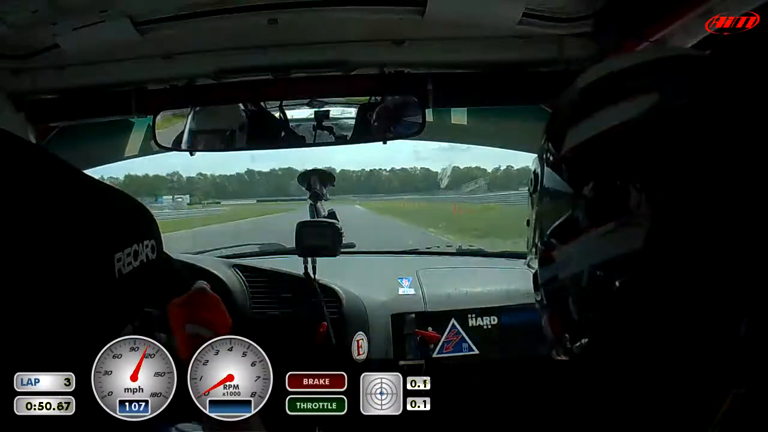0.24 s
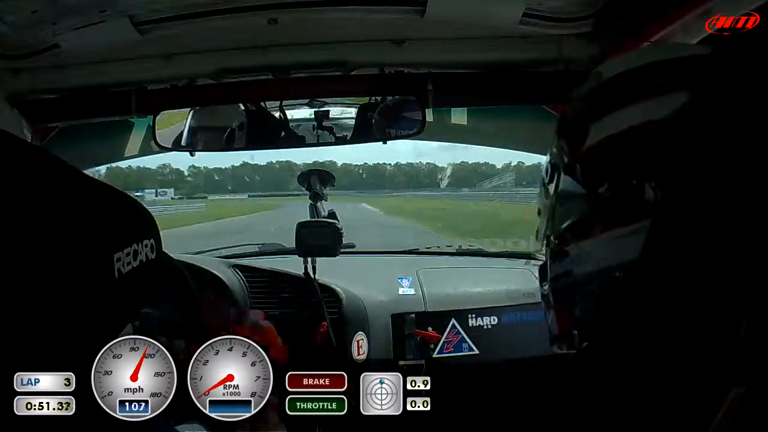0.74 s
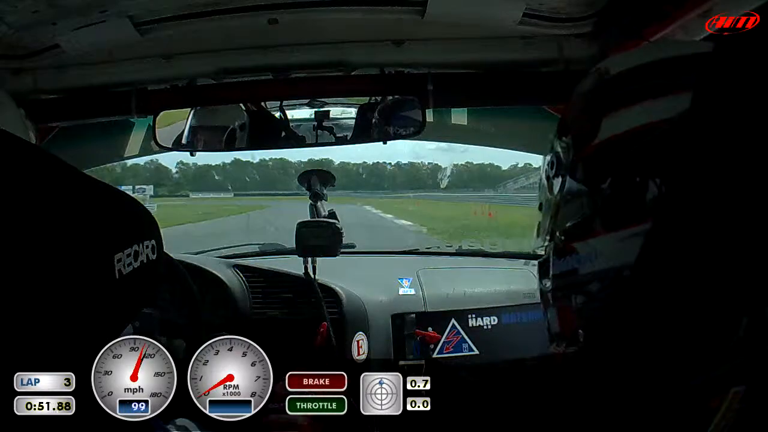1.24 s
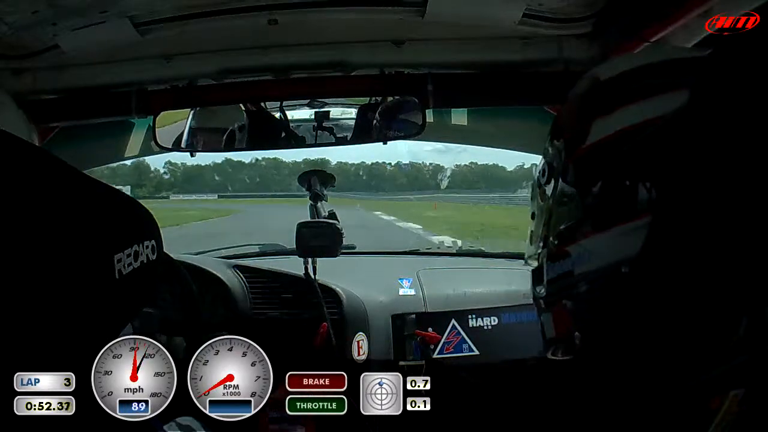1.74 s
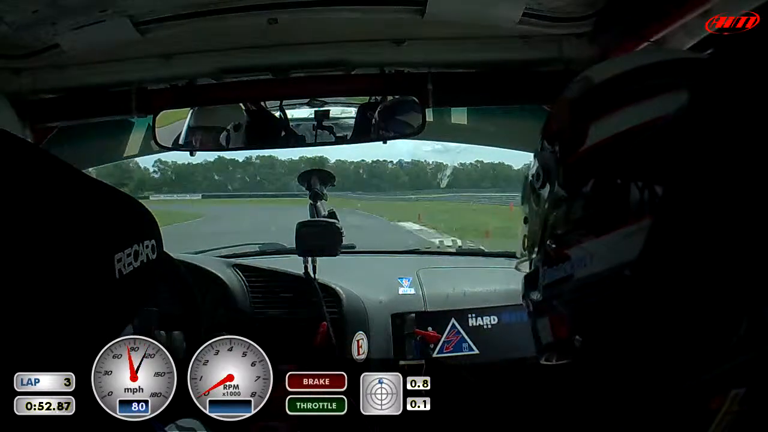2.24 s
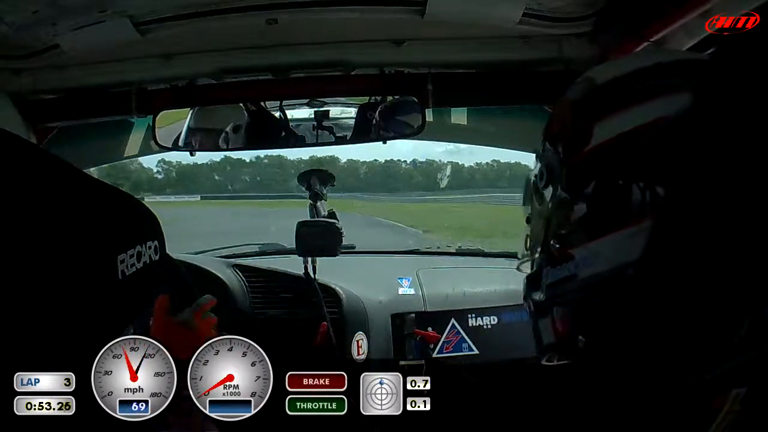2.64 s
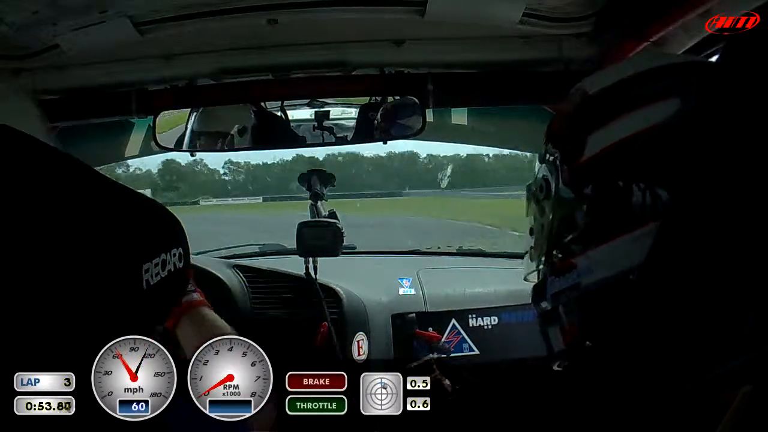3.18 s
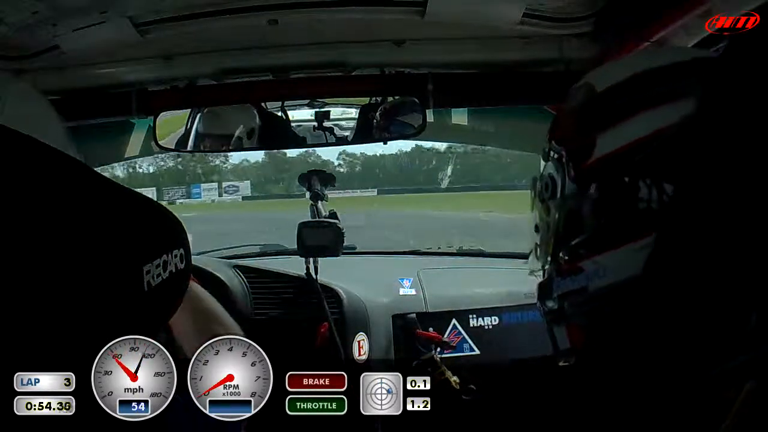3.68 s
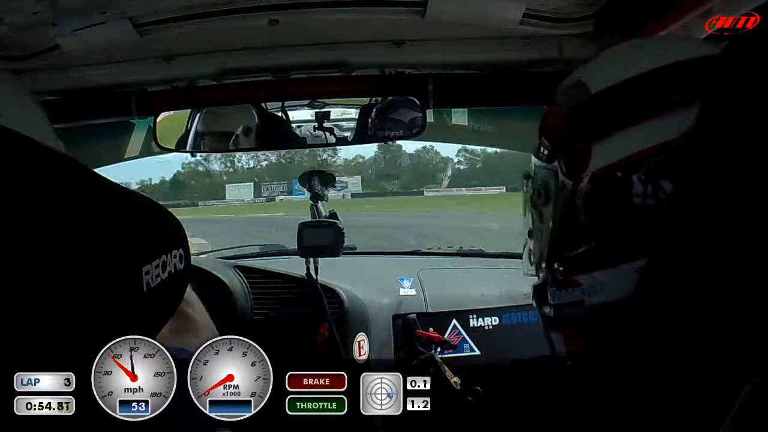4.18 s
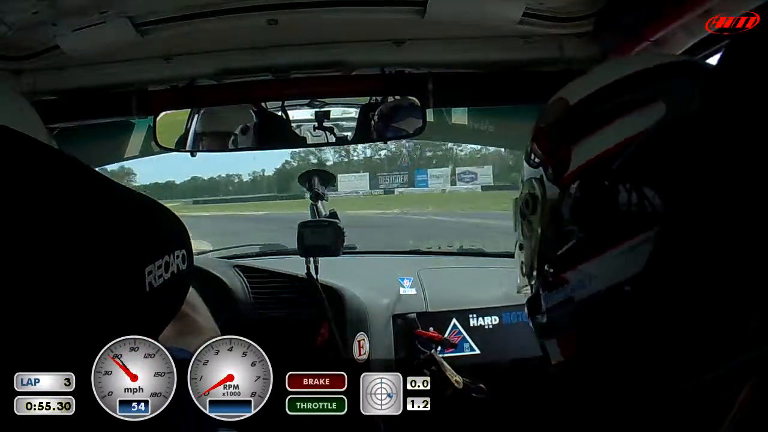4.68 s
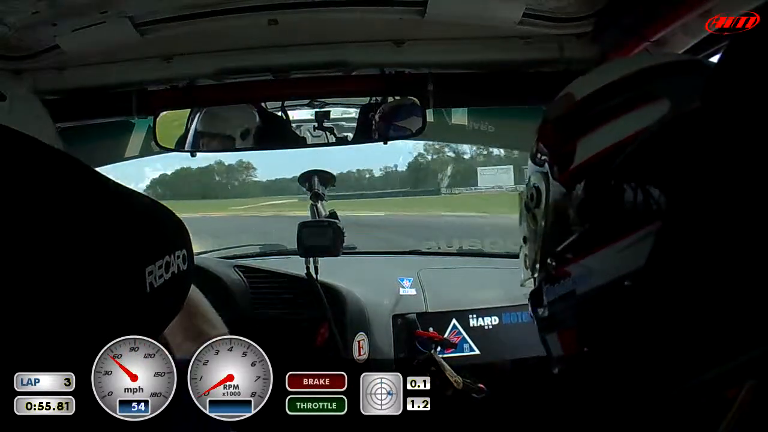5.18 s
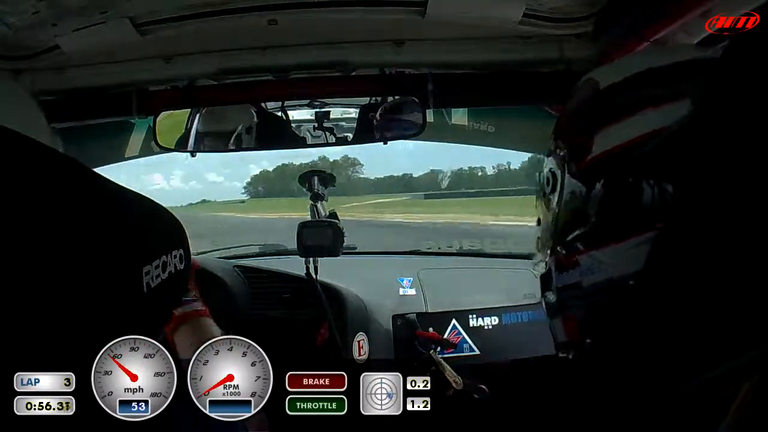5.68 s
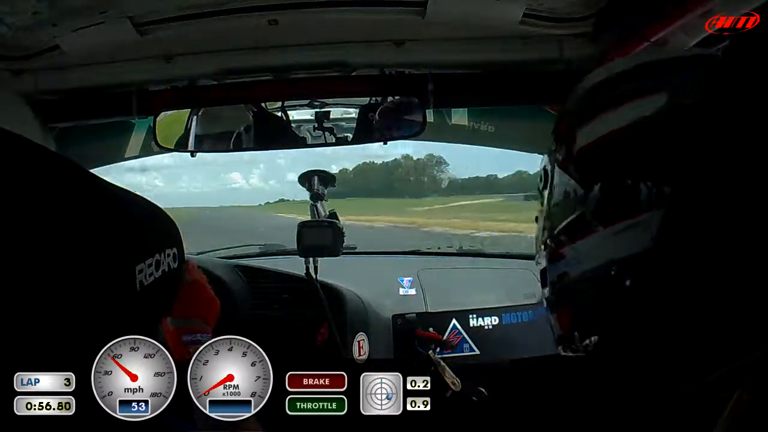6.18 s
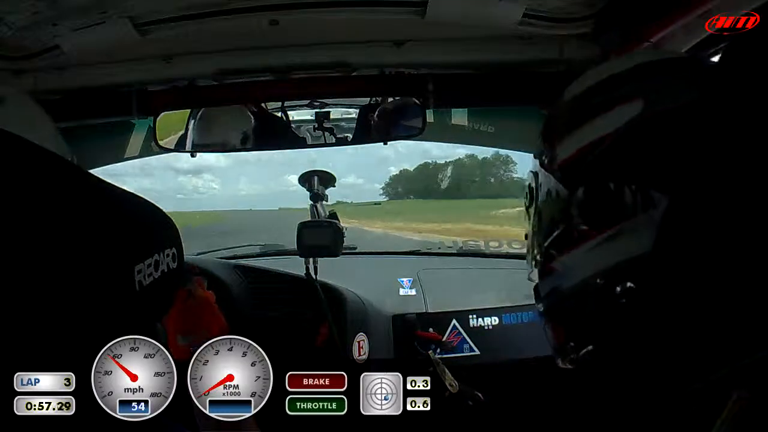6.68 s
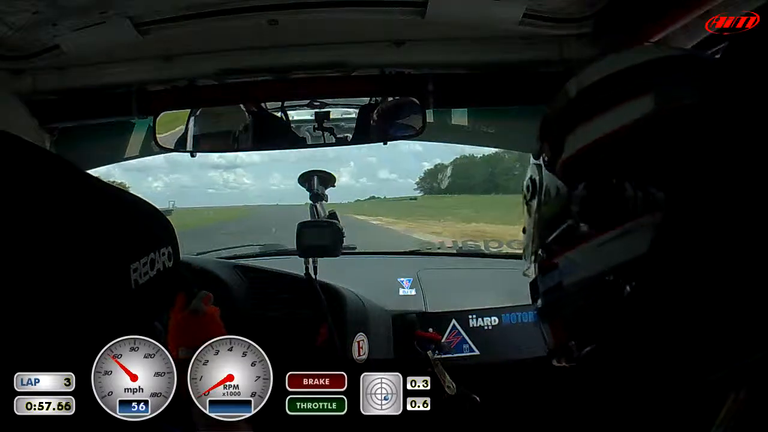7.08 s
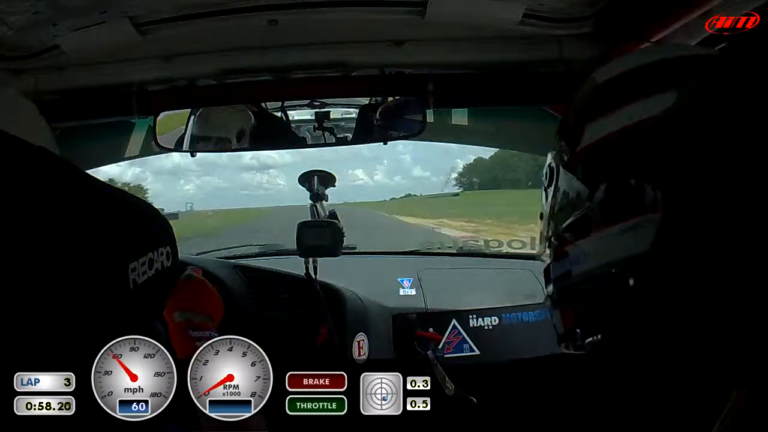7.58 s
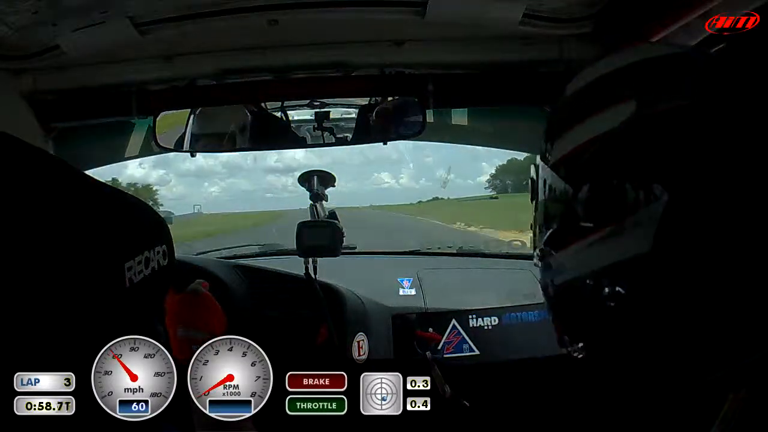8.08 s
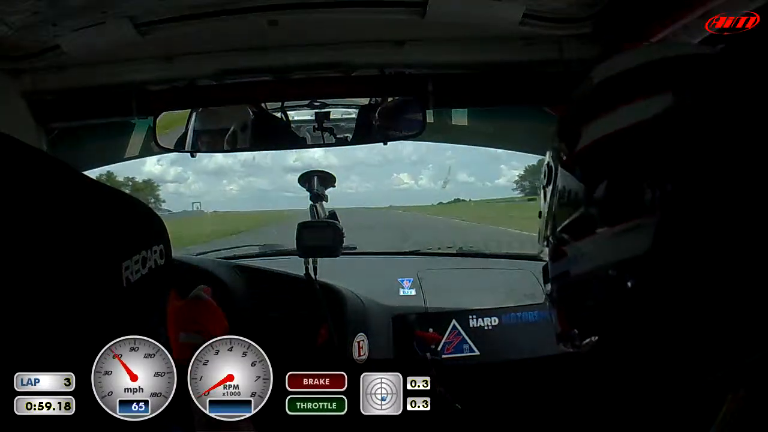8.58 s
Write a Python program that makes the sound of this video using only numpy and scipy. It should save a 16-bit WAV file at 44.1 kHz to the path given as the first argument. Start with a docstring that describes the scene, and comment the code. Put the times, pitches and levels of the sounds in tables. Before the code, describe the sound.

Inside a stripped race car on a circuit, a six-cylinder engine drops in pitch under hard braking, churning and howling over tyre roar and air hiss. A blip lifts the revs for a downshift, thin panels buzz, loose fittings rattle, and the engine wavers through a long bend before climbing steadily with a full, raspy boom. A small, dull-topped microphone sits between the seats.

```python
"""A booming, howling six-cylinder engine fills a bare race car that brakes from high speed with tyres roaring.
It blips down a gear, holds a long bend and pulls away; the microphone sits between the seats.
Boom, howl and overtones are sines locked to the engine; growl adds dense harmonics and pulsed noise.
Pulsed noise makes the intake rasp and the chatter of thin parts; plain noise, the road and airstream.
A wavering low tone is air throbbing at the window; bursts of contacts ring fittings, pedal and chassis."""
import sys
import numpy as np
from scipy import signal
from scipy.fft import rfft, irfft, next_fast_len
from scipy.io import wavfile

SR = 44100
rng = np.random.default_rng(int(sys.argv[2]) if len(sys.argv) > 2 else 0)


def master_out(mix):
    """Clip the mix to full scale and print it as 16-bit PCM to the path in sys.argv[1]."""
    frames = np.transpose(np.atleast_2d(mix))
    ceiling = np.clip(frames, -1, 1)
    pcm = np.round(ceiling * 32767).astype(np.int16)
    wavfile.write(sys.argv[1], SR, pcm)


N = 389403
T = np.arange(N) / SR

# Engine tones at whole multiples of the firing rate.
# Each row: multiple, level in dB before resonances and a common lift, loss in dB with the throttle shut.
OVERTONES = [(2, -32.5, 18.5), (3, -44.5, 18.5), (5, -47.5, 23), (6, -48.5, 25.5)]
# Jolts that briefly set thin parts chattering.
# Each row: centre in seconds, length in seconds, panel and trim levels in dB before each part's own offset.
JOLTS = [(1.773, 0.06, -77, -51.5), (1.942, 0.025, -51, -79), (2.04, 0.037, -53, -53.5),
         (2.163, 0.12, -49.5, -81), (2.273, 0.035, -47, -69), (2.4, 0.044, -45.5, -68),
         (3.209, 0.08, -63, -60), (3.376, 0.044, -67, -54), (3.897, .06, -57, -57), (4.02, .04, -59, -60),
         (4.335, 0.12, -80, -61), (4.66, 0.14, -69, -56), (5.878, .03, -74, -58)]


def amp(db):
    """Decibels to gain."""
    return 10 ** (np.asarray(db) / 20)


def unit(x):
    """Scales to rms 1."""
    return x / np.sqrt(np.mean(x ** 2) + 1e-20)


def curves(rows):
    """Each column of a table as a curve in time, drawn straight between its rows."""
    s, *columns = np.transpose(rows)
    return [np.interp(T, s, c) for c in columns]


def bump(x, centre, width):
    """A bell of height 1 that falls to about 0.6 at half a width from its centre."""
    return np.exp(-2 * ((x - centre) / width) ** 2)


def swells(rows):
    """Gain over time of smooth bursts given as (centre s, length s, dB)."""
    return sum(amp(db) * bump(T, s, length) for s, length, db in rows)


def together(*levels_db):
    """Gain of unrelated sounds added by power."""
    return np.sqrt(sum(amp(db) ** 2 for db in levels_db))


def wander(hz, step=16):
    """Slow random drift of rms 1, fading steeply above hz."""
    count = len(T[::step])
    f = np.fft.rfftfreq(count, step / SR)
    spectrum = rfft(rng.standard_normal(count)) / (1 + (f / hz) ** 4)
    return unit(np.interp(T, T[::step], irfft(spectrum, count)))


def in_cabin(x, spectrum):
    """Shapes a source by its spectrum and the cabin's resonances, at rms 1."""
    # Cabin and panel resonances and dips. Each row: centre in Hz, width in Hz, height in dB.
    cabin = [(338.3, 43, 4.5), (437, 20, -3.5), (646, 18, 0.5), (810.4, 87, -14.5), (932, 74, 3.5),
             (1039.5, 39, 7.5), (1391, 47, 8), (1553, 58, 9.5), (1870, 250, -4.5), (2040, 83, 5.5),
             (2480, 120, 3.5), (2827, 180, 7), (2985, 200, -6), (3900, 150, 1.5), (5590, 200, 5.5)]
    size = next_fast_len(N + 8192)
    f = np.fft.rfftfreq(size, 1 / SR)
    hz, level = np.transpose(spectrum)
    db = np.interp(np.log(f + 1), np.log(hz), level)
    db += sum(height * bump(f, centre, width) for centre, width, height in cabin)
    return unit(irfft(rfft(x, size) * amp(db), size)[:N])


def controls():
    """Firing rate in Hz, and how far the throttle is shut (0-1)."""
    # Engine speed. Each row: time in seconds, firings per second.
    firing = [(0, 275), (.5, 270), (.85, 260), (1.3, 228), (1.55, 218), (1.85, 197), (2.07, 218),
              (2.5, 193), (3.1, 171.1), (3.5, 169.3), (4.3, 174.3), (4.55, 171.1), (4.85, 166),
              (5.3, 170.3), (5.6, 171), (6.05, 175.2), (6.8, 185.7), (7.8, 202.5), (8.83, 220)]
    # Accelerator: open fires evenly and loudly, shut churns. Each row: time in seconds, opening 0-1.
    throttle = [(0, 0.24), (.3, 0), (1, 0), (1.8, 0.23), (2.1, 0.06), (2.7, 0.18), (3.1, 0.39), (3.5, 0.06),
                (3.9, 0.63), (4.3, 0.65), (4.6, 0.19), (5, .05), (5.38, 0.68), (6.2, 0.83), (6.7, 0.97),
                (7.8, 0.96), (8.83, 1)]
    return curves(firing)[0], 1 - curves(throttle)[0]


def pipe_db(hz):
    """What the exhaust and cabin resonances add to a tone, which swells as it crosses one."""
    # Each row: centre in Hz, width in Hz, height in dB.
    pipe = [(128, 11, 24.5), (171.7, 6.3, 5), (185.7, 5.8, 3.5), (197.2, 23.9, 13.5), (233, 22, -6),
            (274.4, 9, 9), (358.6, 9.8, 7.5), (393.7, 11, 5), (541, 18, 7.5), (617.4, 45, 12),
            (918, 28, 10.5), (1007.5, 33, 14.5), (1056, 35, 16), (1112, 18, 7)]
    return sum(db * bump(hz, centre, width) for centre, width, db in pipe)


def puffs(turns, length, steady):
    """Noise that flares once a turn and dies within a share of it, over a steady floor."""
    return (steady + np.exp(-(turns % 1) / length)) * rng.standard_normal(N)


def shaken(part, hz, shut, edge=6):
    """Gain of a chatter that sets in abruptly as the firing rate enters its range."""
    centre, width, rest_db, added_db, shut_db = part
    inside = np.exp(-2 * abs((hz - centre) / width) ** edge)
    return amp(rest_db + added_db * inside - shut_db * shut)


def motion(law, cruise_kmh=100):
    """Gain of a noise that grows with road speed and, under throttle, with the engine's shaking."""
    # Road speed. Each row: time in seconds, km/h.
    speed = [(0, 223), (.7, 182), (1.75, 136), (2.5, 114), (3.4, 90), (4.2, 95), (6.6, 84), (8.83, 132)]
    cruise_db, doubling_db, engine_db, shut_db = law
    shut = controls()[1]
    doublings = np.log2(curves(speed)[0] / cruise_kmh)
    return together(cruise_db + doubling_db * doublings, engine_db - shut_db * shut)


def boom(hz, shut, even, firings):
    """The firing pulse itself, one sine at the firing rate, less steady as the throttle shuts."""
    # Surges as the clutch and throttle work through the downshift.
    # Each row: centre in seconds, length in seconds, rms level in dB before the unsteadiness.
    blips = [(1.77, 0.047, -25.5), (1.95, .04, -23.5), (2.19, .12, -24.5)]
    open_db, shut_loss_db = -25, 14.5  # before the resonances
    strength = np.hypot(amp(open_db + pipe_db(hz) - shut_loss_db * shut), swells(blips))
    unsteady = 1 + .45 * (1 - even) * wander(36)
    return np.sqrt(2) * strength * np.sin(2 * np.pi * firings) * unsteady


def bank(hz, shut, firings):
    """One cylinder bank, a sine at half the firing rate."""
    open_db, shut_gain_db = -38, 0.5  # before the resonances
    strength = amp(open_db + pipe_db(hz / 2) + shut_gain_db * shut)
    return strength * np.sin(np.pi * firings) * (1 + .1 * wander(16))


def howl(firings):
    """A howl under hard braking, a wavering sine at 2.5 times the firing rate."""
    # Each row: time in seconds, level in dB before a 1 dB lift.
    howling = [(0, -61), (.9, -42), (1.2, -41), (1.4, -35), (1.75, -39), (1.9, -51), (2.6, -47)]
    tone = np.sin(5 * np.pi * firings + 0.39 * wander(32))
    return amp(curves(howling)[0] + 1) * tone * (1 + 0.18 * wander(23))


def overtones(hz, shut, firings, lift_db=4):
    """Sines at multiples of the firing rate, each swelling at the resonances."""
    out = np.zeros(N)
    for k, db, shut_db in OVERTONES:
        strength = amp(db + pipe_db(k * hz) - shut_db * shut + lift_db)
        out += strength * (1 + .22 * wander(19)) * np.sin(2 * np.pi * (k * firings + rng.random()))
    return out


def cycle(turns, bank_db, size=4096, count=130):
    """Four-stroke pressure: unequal cylinders fill in harmonics between the main firing tones."""
    # Strong harmonics of the cycle. Each row: multiple of the cycle rate, dB over the ordinary ones.
    strong = [(10, 11), (24, 12.5), (26, 6), (29, 4.5), (33, 8.5), (35, 5.5), (39, 6.5), (42, 5.5),
              (48, 5.5), (54, 8), (60, 15.5)]
    db = np.zeros(count)
    db[3::6] = bank_db  # odd multiples of half the firing rate
    for k, level in strong:
        db[k] = level
    lines = amp(db) * np.exp(2j * np.pi * rng.random(count))
    # leave out the steady pressure, the cycle rate, and the boom and overtones made elsewhere
    lines[[0, 1, 6] + [6 * row[0] for row in OVERTONES]] = 0
    return np.interp(turns % 1, np.arange(size) / size, irfft(lines, size))


def standing_waves(x, echo=.55, decay_s=0.015):
    """Dense early echoes: a gliding harmonic swells and fades as it passes their peaks and dips."""
    t = T[:SR // 10]
    tail = rng.standard_normal(len(t)) * np.exp(-t / decay_s)
    return x + echo * signal.oaconvolve(x, tail / np.linalg.norm(tail))[:N]


def growl(hz, shut, even, firings, cycles):
    """Even harmonics under throttle give way to churning noise, growing with throttle and revs."""
    # Spectra of the harmonics and the churn. Each row: frequency in Hz, density in dB before the cabin.
    growl_spectrum = [(60, -39.5), (130, -9.5), (200, -7), (300, 1.5), (400, 1), (500, -6.5), (700, -1.5),
                      (1000, -1.5), (1250, -7.5), (1600, -20), (1740, -22), (1850, -29.5), (2050, -28.5),
                      (3000, -43), (5000, -56.5)]
    churn_spectrum = [(150, -30), (300, -1.5), (420, 6), (520, 2.5), (700, -0.5), (1000, -2.5),
                      (1200, -6.5), (1500, -19), (1800, -19), (2400, -32), (4000, -44), (8000, -86)]
    open_db, shut_loss_db, octave_db, mid_firing_hz = -30, 7, 13.5, 200
    # the balance between cylinders drifts, so single harmonics swell and fade
    steady, drifting = cycle(cycles, bank_db=4.5), cycle(cycles, bank_db=7.5)
    harmonics = steady * (1 + 0.15 * wander(52)) + .5 * drifting * wander(4.9)
    tones = in_cabin(standing_waves(harmonics), growl_spectrum)
    churn = in_cabin(puffs(firings, length=0.42, steady=1.0) * amp(1.4 * wander(56)), churn_spectrum)
    strength = amp(open_db - shut_loss_db * shut + octave_db * np.log2(hz / mid_firing_hz))
    return strength * (amp(0.83) * even * tones + amp(0.02) * np.sqrt(1 - even ** 2) * churn)


def rasp(hz, shut, firings):
    """Intake noise puffing at each firing, strongest within a range of firing rates."""
    # Each row: frequency in Hz, density in dB before the cabin.
    intake = [(800, -15.5), (1800, -4.5), (2300, -2.5), (2480, 1.5), (2630, -7), (2810, -0.5),
              (3350, -13.5), (3660, 7), (3950, -9), (5000, -3), (6000, -1), (7100, -15), (7700, -15.5),
              (9000, -44.5)]
    # Range centre and width in Hz, dB outside, dB added inside, dB lost with the throttle shut.
    rasp_shake = (199, 18.5, -61, 11.5, 14)
    noise = puffs(firings, length=0.19, steady=0.25) * amp(2.6 * wander(70))
    return shaken(rasp_shake, hz, shut) * in_cabin(noise, intake)


def panel_buzz(hz, shut, ragged, firings):
    """A thin panel chatters at each firing when the rate nears its own, and at jolts."""
    # Each row: frequency in Hz, density in dB before the cabin.
    panel_spectrum = [(1500, -32), (2400, -14), (3300, -29), (3660, -11.5), (3950, -18), (5300, -24.5),
                      (5750, -6.5), (6040, 7.5), (6400, -10.5), (7100, -16), (9000, -45.5)]
    # Range centre and width in Hz, dB outside, dB added inside, dB lost with the throttle shut.
    panel_shake = (199, 22, -64.5, 18, 19)
    jolted = swells((s, length, db - 3) for s, length, db, _ in JOLTS)
    noise = puffs(firings, length=.3, steady=0.49) * amp(6.1 * ragged * wander(40))
    return np.hypot(shaken(panel_shake, hz, shut), jolted) * in_cabin(noise, panel_spectrum)


def trim_sizzle(hz, shut, ragged, cycles):
    """Thin trim sizzles once a crank turn when the firing rate nears its own, and at jolts."""
    # Each row: frequency in Hz, density in dB before the cabin.
    trim_spectrum = [(2000, -22.5), (3700, 2.5), (5600, -11.5), (6400, -2), (6850, 2), (7120, 1.5),
                     (7500, -10), (8000, -19.5), (9000, -34)]
    # Range centre and width in Hz, dB outside, dB added inside, dB lost with the throttle shut.
    trim_shake = (195.5, 14, -64.5, 13, 13.5)
    jolted = swells((s, length, db + 0.5) for s, length, _, db in JOLTS)
    noise = puffs(2 * cycles, length=0.27, steady=0.59) * amp(5 * ragged * wander(50))
    return np.hypot(shaken(trim_shake, hz, shut), jolted) * in_cabin(noise, trim_spectrum)


def engine():
    """Everything locked to the crank, whose timing jitters more as the throttle shuts."""
    hz, shut = controls()
    even = np.clip(1.15 * (1 - shut), 0, 0.89)  # evenness of firing
    ragged = 1 - 1.1 * even
    firings = np.cumsum(hz * (1 + .007 * (1 - even) * wander(25))) / SR
    cycles = firings / 6  # six cylinders fire in each four-stroke cycle
    tones = boom(hz, shut, even, firings) + bank(hz, shut, firings) + howl(firings)
    tones += overtones(hz, shut, firings) + growl(hz, shut, even, firings, cycles)
    chatter = panel_buzz(hz, shut, ragged, firings) + trim_sizzle(hz, shut, ragged, cycles)
    return tones + rasp(hz, shut, firings) + chatter


def road(uneven_db=1.25, patch_roar_db=-6):
    """Tyre roar on uneven asphalt shakes the shell and keeps the cabin's main air mode droning."""
    # Spectra of roar and drone. Each row: frequency in Hz, density in dB before the cabin.
    roar_spectrum = [(12, -13), (25, 6.5), (55, 0.5), (75, -4), (95, 2.5), (150, -4), (225, -7.5), (280, 1),
                     (340, 1.5), (400, -18), (600, -38.5), (1500, -55), (5000, -92)]
    drone_spectrum = [(60, -48), (100, -18), (118, -0.5), (128, 10), (138, -15.5), (160, -22.5), (190, 1),
                      (215, -19), (250, -48.5), (1000, -88)]
    # Before the unevenness: dB at 100 km/h, dB per doubling of speed,
    # dB of the engine's share, dB that share loses with the throttle shut.
    roar_law = (-28.5, 4.5, -32.5, 14)
    drone_law = (-30, 3.5, -48, 14)
    # Rough patches that set the shell and the cabin air booming.
    # Each row: centre in seconds, length in seconds, drone level in dB before the unevenness.
    patches = [(.45, .15, -29), (1.55, 0.64, -26.5), (2.15, 0.22, -17), (2.8, 0.083, -24)]
    rough = swells(patches)
    drone = np.hypot(motion(drone_law), rough) * in_cabin(rng.standard_normal(N), drone_spectrum)
    roar_gain = np.hypot(motion(roar_law), amp(patch_roar_db) * rough)
    roar = roar_gain * in_cabin(rng.standard_normal(N), roar_spectrum)
    return (drone + roar) * amp(uneven_db * wander(5.3))


def air(throb_hz=37.2, throb_db=-32, flutter_db=3):
    """The cabin throbs through the window like a blown bottle, under the hiss of the airstream."""
    # Each row: frequency in Hz, density in dB before the cabin.
    hiss_spectrum = [(600, -10.5), (1500, 4.5), (2200, -14), (3200, -3.5), (4200, 3.5), (5500, -0.5),
                     (6300, -8), (7100, -13), (8000, -28.5), (9000, -35.5)]
    # dB at 100 km/h, dB per doubling of speed, dB of the engine's share, dB that share loses when shut.
    hiss_law = (-58.5, 11.5, -53, 23.5)
    # Gusts that drive the throb harder. Each row: centre in seconds, length in seconds, rms level in dB.
    gusts = [(.55, .08, -20.5), (1.2, 0.16, -21.5), (1.72, 0.51, -17), (1.97, 0.085, -26),
             (2.65, 0.068, -23), (3.35, 0.5, -23.5), (3.93, .2, -18.5), (4.55, .33, -17.5),
             (4.85, 0.11, -21), (5.5, 0.27, -19), (6.35, 0.26, -22.5), (6.95, 0.17, -27),
             (8.62, 0.46, -25.5)]
    strength = np.hypot(amp(throb_db + flutter_db * wander(5.1)), swells(gusts))
    phase = 2 * np.pi * np.cumsum(throb_hz + 1.1 * wander(7.6)) / SR
    throb = np.sqrt(2) * strength * np.sin(phase)
    hiss = in_cabin(rng.standard_normal(N) * amp(1.2 * wander(40)), hiss_spectrum)
    return throb + motion(hiss_law) * hiss


def ring(modes, rise_s=.0003):
    """The dying modes of one part after a single contact."""
    t = T[:SR // 4]
    tones = sum(amp(db - 60 * t / t60) * np.sin(2 * np.pi * hz * t) for hz, db, t60 in modes)
    return tones * (1 - np.exp(-t / rise_s))


def rattles(level_db=-6, dry_db=-6, dry_low_hz=3300, dry_high_hz=6000, order=5):
    """A jolted fitting chatters in a dense, dying burst of contacts: dry clicks and a short ring."""
    # Each row: start in seconds, strength in dB before the common level, decay time in seconds.
    bursts = [(0.285, -37, 0.021), (0.328, -37.5, 0.02), (1.3735, -33, 0.022), (2.72, -38.5, 0.018),
              (3, -42, 0.0088), (3.064, -40, 0.01), (3.135, -34, 0.014), (3.143, -38, 0.02),
              (3.2236, -37.5, 0.023), (3.274, -42.5, 0.009), (3.309, -36.5, 0.015), (3.6602, -31, 0.022),
              (3.678, -37, 0.025), (3.835, -37, 0.02), (3.906, -41.5, 0.018), (3.989, -39.5, 0.038),
              (4.595, -38, 0.013), (4.652, -42, 0.035), (4.792, -40.5, 0.0045), (5.016, -39, 0.005),
              (5.303, -40, 0.01)]
    # Modes of the fittings. Each row: frequency in Hz, relative level in dB, 60 dB decay in seconds.
    fitting = [(1384, 11.5, 0.04), (2436, -0.5, 0.03), (2690, -12, 0.087), (3430, -7, .04),
               (3830, -4.5, 0.021), (3915, 1.5, 0.055), (4220, -11, 0.017), (4600, -6, 0.065),
               (5250, -4, 0.037), (5340, -0.5, 0.041), (5730, -12, 0.031), (6600, -12.5, .02)]
    force = np.zeros(N)
    for s, db, decay_s in bursts:
        after = force[round(s * SR):]  # a view, so adding to it adds to force
        after += amp(db + level_db) * np.exp(-T[:len(after)] / decay_s)
    contacts = force * unit(rng.standard_normal(N) * amp(3 * wander(700)))
    part = ring(fitting)
    ringing = signal.oaconvolve(contacts, part / np.linalg.norm(part))[:N]
    band = signal.butter(order, [dry_low_hz, dry_high_hz], "bandpass", fs=SR, output="sos")
    clicks = signal.sosfilt(band, contacts)
    return ringing + amp(dry_db) * clicks * contacts.std() / clicks.std()


def strikes(rows, modes, chatter_s, level_db):
    """Each blow is a hard contact and a short scatter of lighter ones that ring one part."""
    part = ring(modes)
    t = T[:len(part)]
    out = np.zeros(N + len(t))
    for s, db in rows:
        contacts = 0.081 * rng.standard_normal(len(t)) * np.exp(-t / chatter_s)
        contacts[0] = 1
        blow = signal.fftconvolve(contacts, part)[:len(t)]
        out[round(s * SR):][:len(t)] += amp(db + level_db) * blow / abs(blow).max()
    return out[:N]


def chassis_knocks():
    """Dull knocks ring the chassis in short, closely tuned modes."""
    # Each row: start in seconds, peak in dB before the common level.
    knocks = [(0.296, -20), (0.3364, -18.5), (2.773, -21.5), (3.1155, -22.5), (3.1447, -24.5)]
    # Each row: frequency in Hz, relative level in dB, 60 dB decay in seconds.
    chassis = [(980, -23, .05), (1076, 0.5, 0.046), (1086, 4, .035), (1380, -14, .04)]
    return strikes(knocks, chassis, chatter_s=0.0065, level_db=-5.0)


def pedal_clacks():
    """A pedal clacks, its contacts ringing one dominant mode."""
    # Each row: start in seconds, peak in dB before the common level.
    clacks = [(0.4369, -37), (0.4678, -48), (0.4834, -31.5)]
    # Each row: frequency in Hz, relative level in dB, 60 dB decay in seconds.
    pedal = [(1500, -15, .015), (1960, -6, 0.078), (2060, 20, 0.02), (2330, -5, 0.053), (3520, -22, .01)]
    return strikes(clacks, pedal, chatter_s=0.0039, level_db=5.5)


def scene():
    """Everything heard from between the seats."""
    return (engine() + road() + air() + rattles() + chassis_knocks() + pedal_clacks())[None]


def record(dry, edge_hz=8900):
    """A small onboard microphone with a narrow band: a low-pass filter takes off the top."""
    lowpass = signal.firwin(511, edge_hz, window=("kaiser", 9), fs=SR)
    return signal.oaconvolve(dry, lowpass[None], "same")


dry = scene()
out = record(dry)
master_out(out)
```